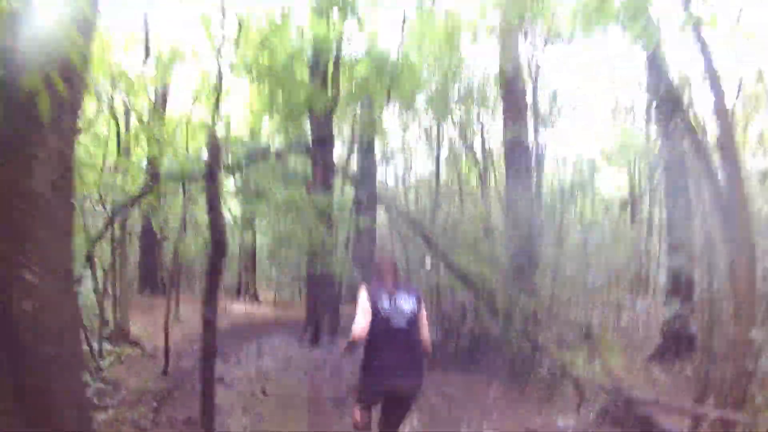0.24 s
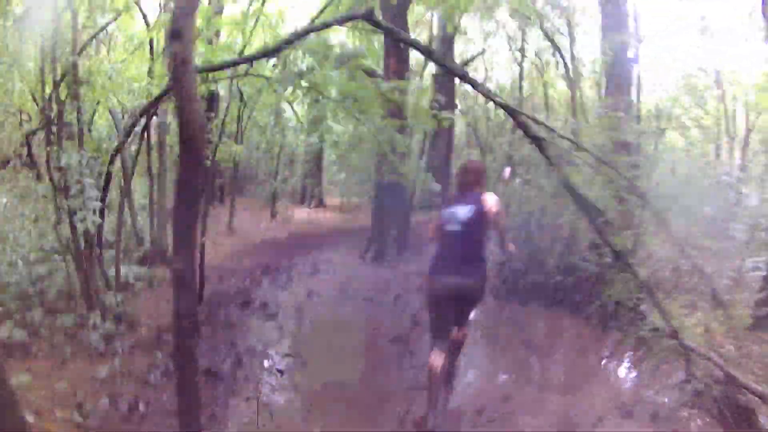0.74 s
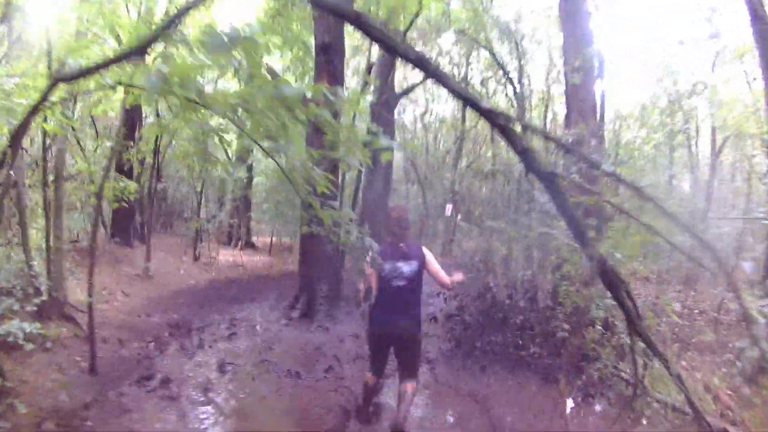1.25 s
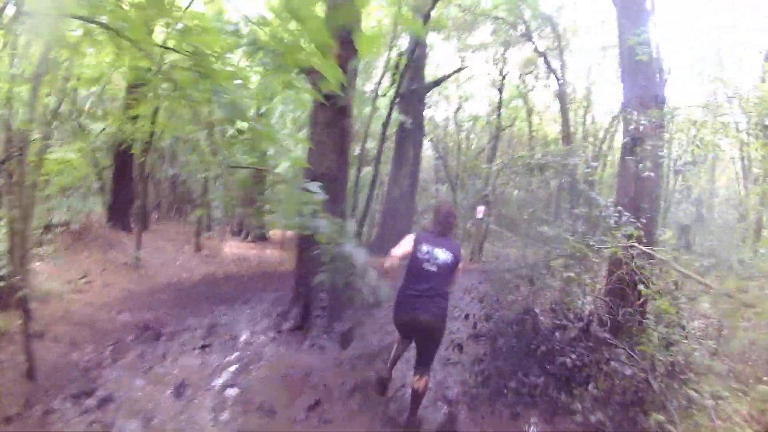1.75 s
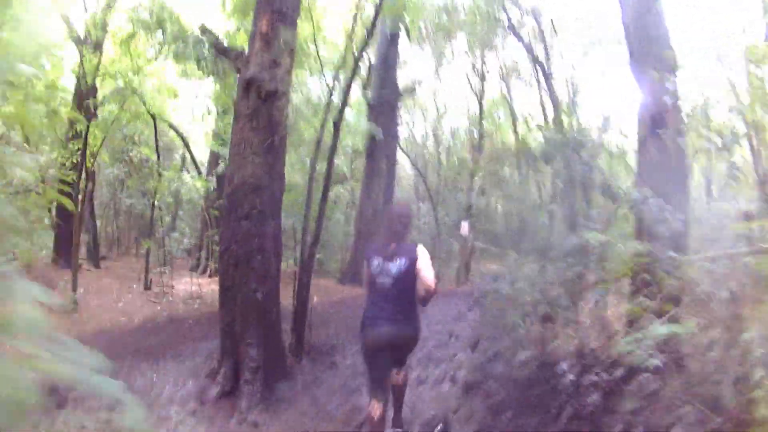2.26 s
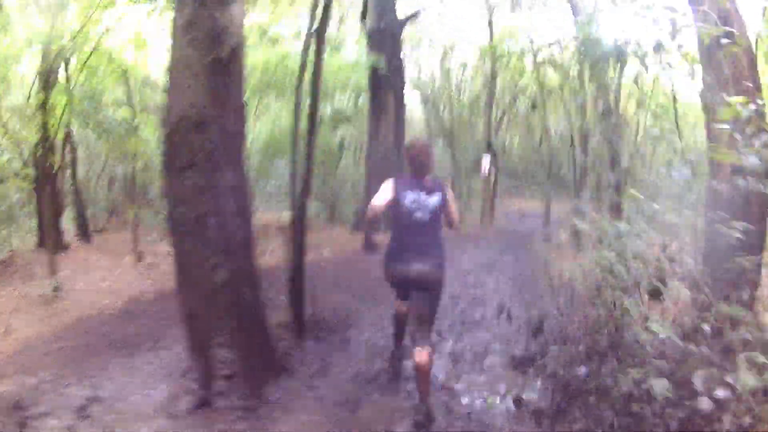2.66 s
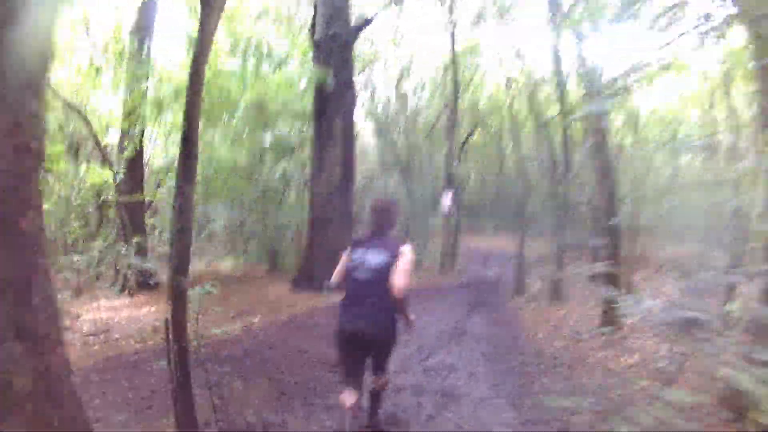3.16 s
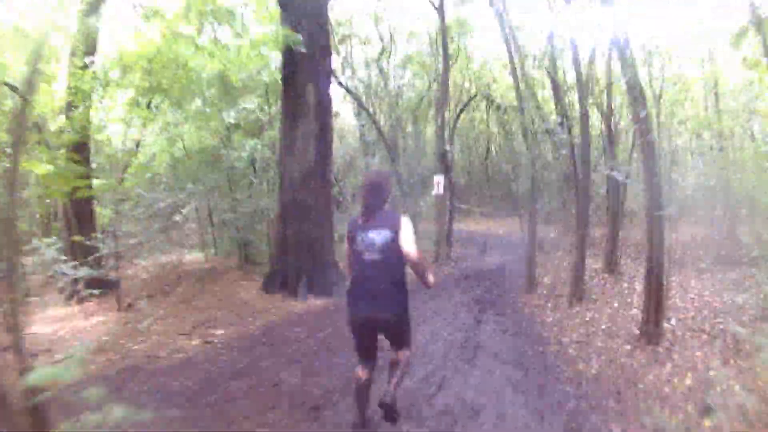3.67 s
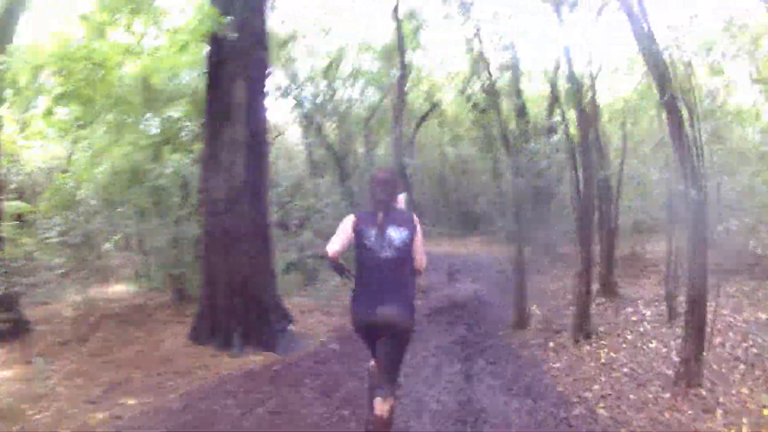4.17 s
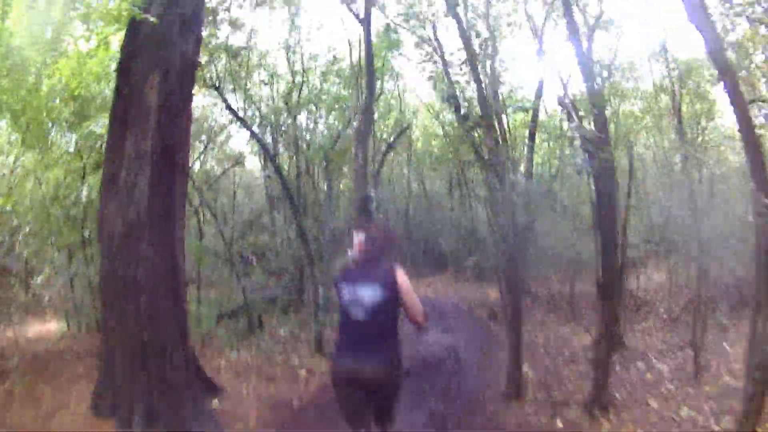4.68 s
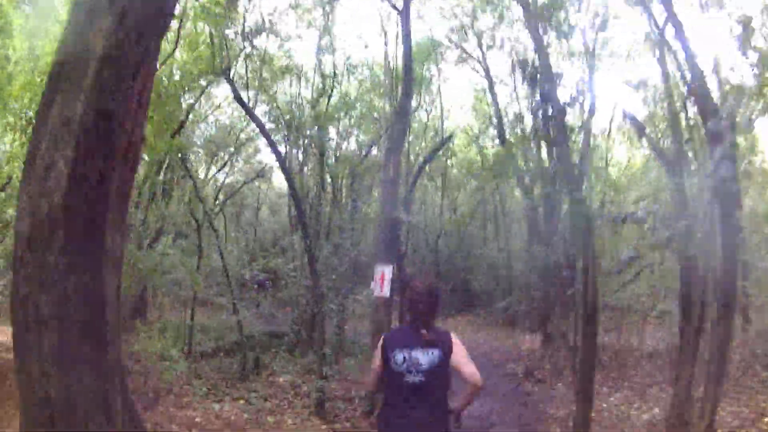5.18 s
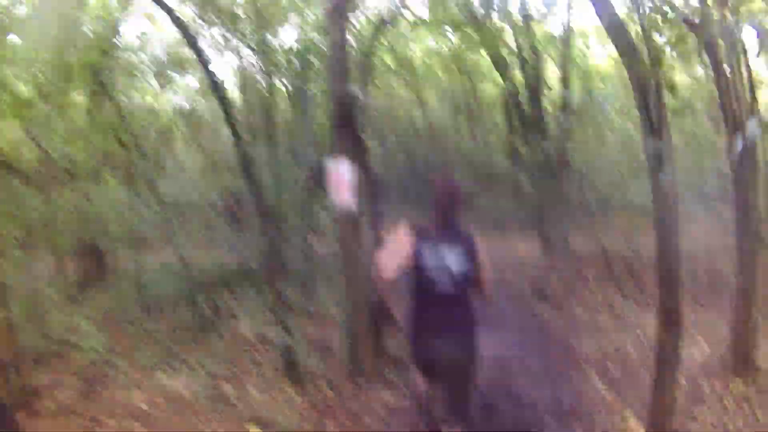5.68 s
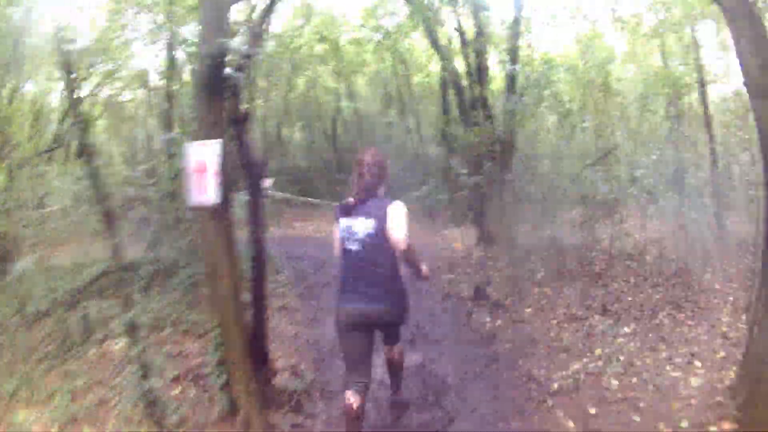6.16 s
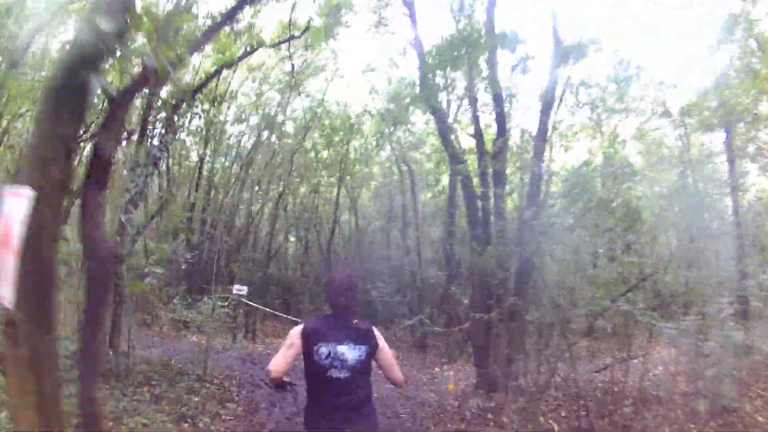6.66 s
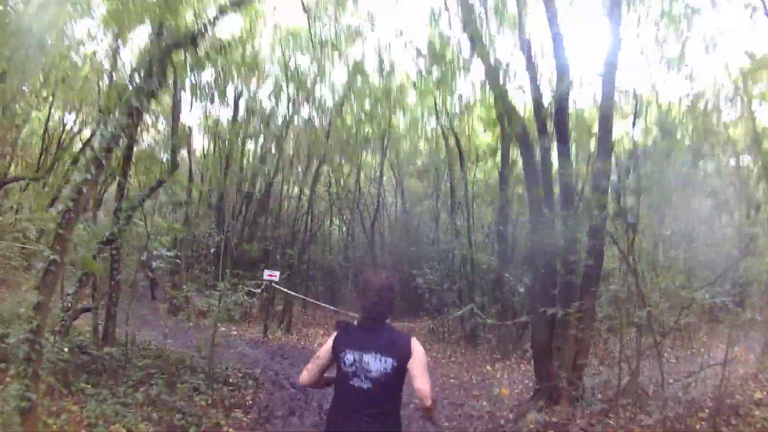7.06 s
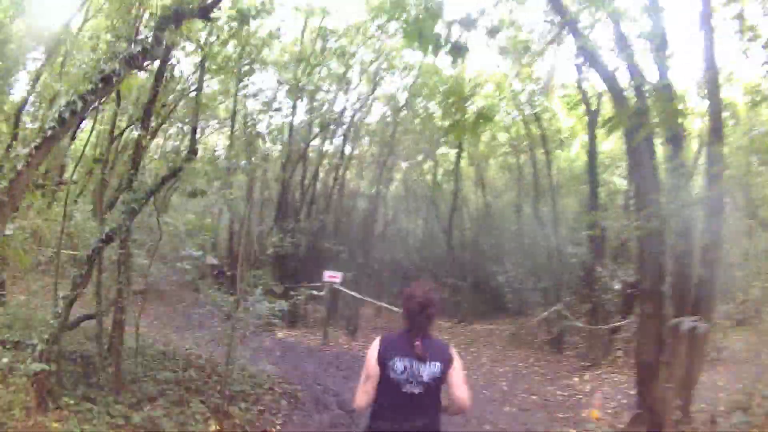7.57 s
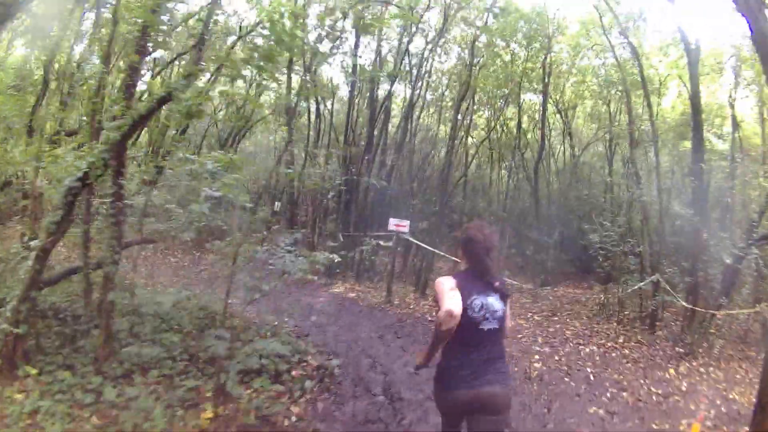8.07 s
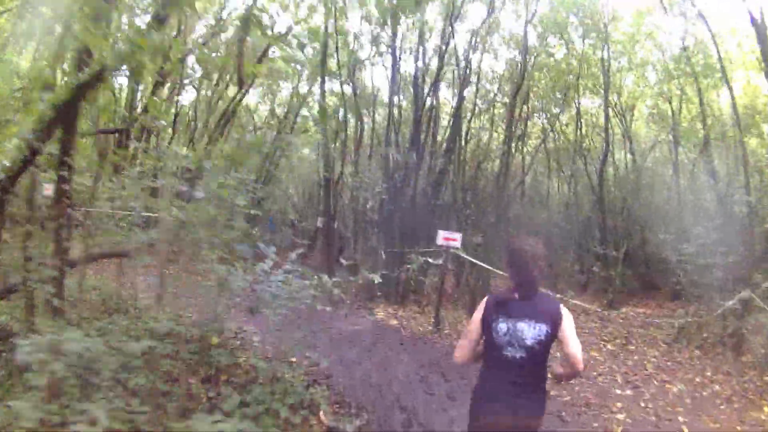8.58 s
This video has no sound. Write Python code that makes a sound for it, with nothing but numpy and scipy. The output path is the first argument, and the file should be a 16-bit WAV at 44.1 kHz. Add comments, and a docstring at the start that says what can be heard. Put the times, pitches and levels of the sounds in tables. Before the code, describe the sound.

Wet mud squelches and sprays under running feet on a forest path. The microphone rides on the runner inside a closed case, so the splats sound boxy and mix with low rumble, deep bumps and small rattles, over faint hiss and a thin whine. The mud is wettest at first. Later, hard distorted thumps of the case hitting the runner take over, each followed by a short drop in level.

```python
"""A small camera in a sealed case rides with a runner along a muddy woodland trail.
From the start, mud sloshes and splats through the case over a low strap rumble, faint hiss and whine.
Strides jolt the case and make it boom; soon bubbles gloop and the camera rattles inside.
From 5.4 s on, hard slams against the runner's body overload the microphone,
and the whole sound ducks for a moment after each one."""
import sys
import numpy as np
from scipy import signal
from scipy.fft import rfft, irfft
from scipy.io import wavfile
from scipy.ndimage import uniform_filter1d

SR = 44100
rng = np.random.default_rng(int(sys.argv[2]) if len(sys.argv) > 2 else 0)


def inscribe(sig):
    """Save sig as 16-bit PCM at rate SR to the path in sys.argv[1].

    A 1-D sig is mono; a 2-D sig holds one channel per row.
    Samples are clipped to [-1, 1] before scaling.
    """
    pcm = np.round(np.clip(np.atleast_2d(sig).T, -1, 1) * 32767)
    wavfile.write(sys.argv[1], SR, pcm.astype(np.int16))


N = 389403

# tone of the amplifier's hiss: f/Hz, level/dB
HISS_SPECTRUM = [(150, -5), (1000, -11.5), (3000, -24.5), (6000, -30.5), (10000, -33), (16000, -34)]
# steady churn of feet in wet mud: t/s, slosh level/dB, strap rumble level/dB
CHURN = [(0, -44, -32), (.12, -43, -34), (.22, -38.5, -34.5), (.42, -38, -36.5), (.52, -48.5, -35.5),
         (.75, -49, -38), (1.05, -43.5, -36), (1.2, -40.5, -37.5), (1.5, -39, -37.5), (1.75, -43, -39),
         (2.05, -42, -35), (2.35, -46.5, -45), (2.5, -42.5, -33.5), (2.9, -43.5, -33), (3.2, -46, -31.5),
         (3.42, -42, -43.5), (3.65, -52.5, -36.5), (3.85, -49, -27.5), (4.15, -41, -37), (4.4, -49, -30.5),
         (4.7, -47, -37), (5.3, -48.5, -33.5), (5.55, -53.5, -33.5), (6.2, -49.5, -34), (6.6, -49, -38.5),
         (7.1, -50, -35), (7.45, -44.5, -33), (7.7, -52.5, -41.5), (8.3, -51.5, -33.5), (8.6, -51.5, -42),
         (8.83, -40.5, -20)]
# splats of mud and rubs on the case: t/s, level/dB, thud offset/dB, spray offset/dB, fade time/s
SPLATS = [(0.0805, -30, -15, -17.5, 0.044), (0.186, -25.5, -19, -24, 0.24),
          (0.347, -26.5, -11.5, -26, 0.039), (.4668, -46, -21, -27, .061), (.541, -27, -19, -15, 0.31),
          (0.807, -26, -38, -22, 0.093), (.897, -33, -9, -17.5, 0.086), (1.015, -28.5, -10, -16.5, 0.048),
          (1.141, -27.5, -18, -31, .062), (1.189, -29, -30, -32, 0.12), (1.31, -28.5, -18, -25, 0.17),
          (1.5899, -20, -34, -26, 0.029), (1.6182, -30, -38, -17, 0.63), (1.808, -32.5, -31, -13, 0.11),
          (1.93, -34, -27, -30, 0.16), (1.9584, -24, -23, -40, 0.068), (2.076, -30, -19, -26, 0.11),
          (2.119, -30, -32, -17.5, 0.22), (2.2218, -32, -32, -16, 0.22), (2.337, -32.5, -17, -18, 0.23),
          (2.5042, -28, -28, -22, 0.072), (2.531, -26.5, -16, -25, 0.23), (2.6407, -32.5, -30, -18, 0.077),
          (2.86, -27, -23, -20, 0.14), (2.906, -26.5, -27, -25, 0.25), (2.933, -22.5, -13, -23, 0.19),
          (3.091, -28, -15, -11, 0.084), (3.1224, -26.5, -15, -26, 0.035),
          (3.1964, -23.5, -22, -24.5, 0.067), (3.2867, -24.5, -30, -31, 0.022),
          (3.3925, -26, -29, -30, 0.14), (3.462, -31.5, -28, -10.5, 0.077), (3.6468, -31, -12, -19, 0.095),
          (3.767, -26, -7.5, -27, 0.046), (4.17, -32, -25, -23, .15), (4.3272, -30, -11, -27, 0.029),
          (4.4562, -30.5, -21, -22, 0.14), (4.602, -33, -22, -11.5, 0.14), (4.941, -31, -30, -23, 0.071),
          (4.993, -31.5, -36, -22, 0.2), (5.0945, -37, -10, -18, 0.18), (5.208, -34, -29, -22, 0.075),
          (5.3644, -27, -12, -16.5, 0.18), (5.712, -32.5, -15, -21, 0.45), (5.7662, -28.5, 1.5, -27, 0.051),
          (5.9605, -39, -4, -32, .05), (5.989, -24, -18, -24, 0.03), (6.1531, -22.5, 2, -14.5, 0.13),
          (6.4642, -24.5, -17, -15.5, 0.092), (6.491, -28.5, -3.5, -19, .059),
          (6.5785, -29.5, -11.5, -18, .084), (6.875, -26.5, -7.5, -25, 0.055),
          (7.1925, -28, -17, -15.5, 0.072), (7.223, -26, -7, -24, 0.058), (7.2735, -27.5, -1, -31, 0.13),
          (7.324, -28, 2.5, -26, 0.028), (7.6198, -27, -4, -19.5, 0.043), (7.9193, -24, -4.5, -22, 0.017),
          (7.9924, -23, -5, -16, 0.16), (8.0744, -31.5, 10, -15, 0.042), (8.347, -27, -16, -18.5, 0.4),
          (8.3898, -21.5, 9, -13, 0.083), (8.625, -37, -3.5, -31, 0.11), (8.746, -21, -4, -17.5, 0.12)]
# fine spray thrown up by a heel: t/s, level/dB
SHOWERS = [(.2748, -62), (.403, -43.5), (.52, -46), (.7796, -45), (1.042, -45), (1.345, -43), (1.4107, -45),
           (1.435, -40), (1.82, -43.5), (2.23, -43.5), (2.652, -40.5), (2.718, -45), (3.242, -44),
           (3.366, -47), (4.023, -48), (4.26, -41.5), (6.38, -46), (7.53, -47), (7.582, -45), (8.68, -50),
           (8.72, -45)]
# notes at which the case's walls, main cavity, small gaps and vent ring: f/Hz, width/Hz, level/dB
WALL_MODES = [(144, 83, 0.5), (300, 160, 0), (429, 120, -3.5), (555, 185, -1.5), (715, 220, 0.5)]
CAVITY_MODES = [(1240, 240, -7), (1347, 117, -2.5), (1470, 107, -1), (1590, 130, -2.5), (1748, 130, -4.5),
                (1903, 160, -5)]
GAP_MODES = [(2763, 490, 4.7), (3340, 500, 2.7), (4042, 320, 5.1)]
VENT_MODES = [(4710, 1530, 3.5), (5360, 430, -8), (6300, 1500, -7), (7510, 360, -9)]
# tone of the strap's rumble: f/Hz, level/dB
RUMBLE_SPECTRUM = [(15, 3), (30, 12.5), (50, 8.5), (80, 1.5), (120, -8), (180, -30), (300, -54.5),
                   (900, -120)]
# jolts of the case on its strap: t/s, level/dB, f/Hz, fade time/s
JOLTS = [(0.075, -6.5, 49.2, 0.16), (.656, -24, 110, 0.061), (.861, -25.5, 70, 0.042),
         (0.939, -3, 49.3, 0.11), (1.489, -23, 45.4, 0.12), (1.523, -20, 44.6, 0.15),
         (1.577, -23, 43.8, 0.18), (2.152, -18, 47, .13), (2.339, -22, 45.3, 0.055),
         (2.368, -8.5, 40, 0.21), (2.535, -7, 43.7, 0.082), (2.587, -11.5, 50, 0.16),
         (2.755, -13, 31.2, .15), (2.81, -19, 27, 0.27), (2.983, -5, 50.5, 0.14), (3.022, -17, 55, 0.086),
         (3.1, -18.5, 45.3, .15), (3.148, -19, 42, 0.099), (3.196, -23, 38.5, .12),
         (3.527, -14, 36.8, 0.19), (3.599, -20, 40.3, 0.23), (3.767, -3.5, 52.5, 0.14),
         (3.821, -20, 52.3, 0.1), (4.307, -19, 33.3, 0.17), (4.34, -15.5, 35.4, .16),
         (4.474, -20.5, 44, 0.24), (4.662, -14, 32.8, 0.19), (4.722, -25, 114, 0.044),
         (4.747, -21.5, 39.2, 0.083), (4.841, -13.5, 47.7, .15), (5.044, -13.5, 30.6, 0.28),
         (5.187, -13.5, 46.2, 0.14), (5.38, -5, 32.7, 0.32), (5.43, -2, 92.3, 0.089),
         (5.736, -13, 45, 0.022), (5.755, -6.5, 39, 0.082), (5.972, -8, 48, 0.12), (6.131, -2, 26.7, 0.18),
         (6.187, -2, 88.4, 0.074), (6.361, -10, 50.9, 0.29), (6.443, -17, 32.2, 0.71),
         (6.487, -20, 124, 0.079), (6.493, -1, 42.6, 0.18), (6.531, 5, 50.9, 0.08), (6.867, -16, 37, 0.15),
         (6.912, -17.5, 28.2, 0.13), (7.075, -16, 40, 0.12), (7.197, -13.5, 58.6, 0.034),
         (7.218, -10, 34.3, 0.14), (7.322, -6.5, 39, 0.087), (7.575, -14, 47.7, 0.38),
         (7.603, -6, 27.6, 0.23), (7.631, -1.3, 30, 0.044), (7.67, -6, 44.3, .055), (7.779, -15, 44.3, 0.1),
         (7.986, -5, 48, 0.077), (8.04, 0.5, 40, 0.062), (8.083, -2.5, 59.7, 0.08),
         (8.364, -1.5, 36, 0.061), (8.412, 3, 49.2, 0.11), (8.44, -4.5, 84, 0.036), (8.59, -13, 50.3, 0.11),
         (8.731, -2.5, 32.3, 0.47), (8.781, 1.5, 90.8, 0.11)]
# hard slams of the case against the runner: t/s, level/dB, f/Hz, fade time/s, slowness of the rise
SLAMS = [(5.4, 14, 55.9, 0.051, 5.1), (6.157, 15, 55.9, 0.055, 4), (7.2334, 6.5, 58.8, 0.047, 7.8),
         (7.276, 7.5, 46.6, 0.059, 2.3), (7.9976, 20.5, 57.7, 0.0523, 3.87), (8.388, 19, 57.6, 0.069, 3.5),
         (8.7509, 20.5, 59.2, 0.035, 4.5)]
# bubbles closing in the mud: t/s, level/dB, first f/Hz, last f/Hz, length/s
GLOOPS = [(.224, -39, 820, 860, .025), (.343, -38, 1000, 1150, .015), (2.685, -42, 420, 900, .05),
          (2.872, -40, 620, 660, .025), (2.92, -41, 320, 600, .035)]
# rattles of the camera against its case: t/s, level/dB, click offset/dB
RATTLES = [(0.849, -35, -11), (2.057, -36.5, -15), (2.369, -33, -10.5), (2.761, -30, -16.5),
           (2.865, -50, -8), (3.536, -41.5, -7.5), (3.619, -32, -21), (4.314, -42.5, -3),
           (4.389, -40.5, -15), (4.509, -39, -18), (4.677, -41.5, -4.5), (4.715, -36, -21),
           (5.097, -32, -15.5), (5.328, -43, -9), (5.391, -23, -17), (5.41, -19.5, -21), (5.759, -35, -8.5),
           (5.842, -33.5, -16), (6.494, -29.5, -16.5), (6.884, -31, -10), (7.227, -24.5, -14.5),
           (7.322, -35, -12), (7.624, -52.5, 11.5), (7.921, -43.5, -8), (8.064, -24.5, -13),
           (8.638, -36.5, -16)]
# hollow ring of the camera body and click of the latch: f/Hz, width/Hz, level/dB
BODY_MODES = [(355, 140, 1), (719, 88, 2), (1158, 90, -5.5)]
LATCH_MODES = [(2530, 390, 3), (2946, 520, 7.5), (3160, 160, -10.5)]
# brief dips of the whole sound after some jolts: t/s, length/s, level/dB
DIPS = [(0.99, 0.15, -1.5), (2.392, 0.15, -2.5), (2.622, 0.17, -3.5), (3.036, 0.17, -3),
        (3.841, 0.16, -10.5), (5.403, .05, -11), (5.484, .14, -11.5), (5.804, .155, -13),
        (6.014, 0.16, -12.5), (6.224, .161, -10), (6.387, 0.26, -5.5), (6.57, 0.15, -5), (7.24, .078, -4),
        (7.314, .149, -5), (7.635, 0.071, -13), (7.711, 0.14, -7), (7.996, .036, -6.5), (8.04, 0.037, -11),
        (8.096, .037, -13), (8.38, .034, -6.5), (8.419, 0.2, -14.5), (8.749, .08, -8)]


def gain_of(db):
    """Turns decibels into a number to multiply by."""
    return 10 ** (np.asarray(db) / 20)


def evened(x):
    """Scales a signal to an average strength (rms) of 1."""
    return x / np.sqrt(np.mean(x ** 2) + 1e-20)


def add(mix, start_s, sound):
    """Mixes a sound in at a given time."""
    part = mix[round(start_s * SR):][:len(sound)]
    part += sound[:len(part)]


def noise(spectrum):
    """Steady noise with the given mix of low and high tones."""
    hz, db = np.transpose(spectrum)
    bins_hz = np.fft.rfftfreq(N, 1 / SR)
    gains = gain_of(np.interp(np.log(bins_hz + 1), np.log(hz), db))
    return evened(irfft(rfft(rng.standard_normal(N)) * gains, N))


def ring(drive, modes):
    """Shakes an object so it rings at its own notes (modes); wider ones die sooner."""
    t = np.arange(2048) / SR
    response = sum(gain_of(db) * np.sqrt(width) * np.exp(-np.pi * width * t) * np.sin(2 * np.pi * hz * t)
                   for hz, width, db in modes)
    response *= 1 - np.exp(-t / 0.00074)  # a soft start keeps the sound close to those notes
    return signal.oaconvolve(drive, response / np.linalg.norm(response))[:N]


def swell(rise_s, fade_s, slowness=0.83):
    """A loudness curve that rises to 1, then falls by 60 dB every fade_s."""
    t = np.arange(round(.4 * SR)) / SR
    shape = (1 - np.exp(-t / rise_s)) ** slowness * gain_of(-60 * t / fade_s)
    return shape / shape.max()


def flicker(size, depth_db):
    """A random gain that changes over about size samples."""
    slow = rng.standard_normal(N // 10 + 2)
    for _ in range(2):
        slow = uniform_filter1d(slow, size // 10)
    return evened(np.interp(np.arange(N) / 10, np.arange(len(slow)), gain_of(depth_db * evened(slow))))


def churn_db(column):
    """One level column of CHURN, sample by sample."""
    rows = np.array(CHURN)
    return np.interp(np.arange(N) / SR, rows[:, 0], rows[:, column])


def electronics(whine_hz=13254, flip_hz=40.9, whine_db=-72, hiss_db=-53.5):
    """The amplifier hisses; a high whine keeps flipping sign, which splits it into many close tones."""
    t = np.arange(N) / SR
    flips = np.sign(np.sin(2 * np.pi * flip_hz * t))
    whine = np.sqrt(2) * np.sin(2 * np.pi * whine_hz * t) * flips
    return gain_of(whine_db) * whine + gain_of(hiss_db) * noise(HISS_SPECTRUM)


def mud(drops_per_s=150, splat_rise_s=0.0039, drying_db_per_s=-1.05):
    """Sloshing, droplets and splats make the walls, cavity, gaps and vent of the case ring."""
    slosh_db = churn_db(column=1)
    lumps = flicker(size=200, depth_db=1.0) * flicker(size=1800, depth_db=1.3)
    drop_sizes = gain_of(4.5 * np.minimum(rng.exponential(1, N), 3))
    drops = evened(drop_sizes * (rng.random(N) < drops_per_s / SR))
    mist_db = 0.72 * slosh_db - 26.5  # steady spray changes less than the slosh
    # one row each for walls, cavity, gaps and vent
    power = (lumps * gain_of([0.4 * slosh_db - 36, slosh_db, mist_db, mist_db - 8.5])) ** 2
    shower = signal.windows.tukey(round(.035 * SR), .7)
    for start_s, db in SHOWERS:
        add(power[2], start_s - .004, (gain_of(db - 9) * shower) ** 2)
        add(power[3], start_s - .004, (gain_of(db - 16.5) * shower) ** 2)
    for start_s, db, thud_db, spray_db, fade_s in SPLATS:
        add(drops, start_s, [30.0])  # each splat lands with a slap
        shape = swell(splat_rise_s, fade_s)
        fizz_db = spray_db - 11 + drying_db_per_s * start_s  # thins as the trail gets drier
        for row, offset_db in zip(power, (thud_db, -9, spray_db - 3.5, fizz_db)):
            add(row, start_s - splat_rise_s, (gain_of(db + offset_db) * shape) ** 2)
    out = np.zeros(N)
    parts = zip(np.sqrt(power), (WALL_MODES, CAVITY_MODES, GAP_MODES, VENT_MODES))
    for (level, modes), wet_db, drop_gain in zip(parts, (2.5, 3.33, 1.5, 1.0), (.15, .25, .45, .8)):
        shares = gain_of([db for _, _, db in modes])
        for mode, share in zip(modes, shares / np.linalg.norm(shares)):
            # bubbles of changing sizes stir each note separately
            bubbling = flicker(size=350, depth_db=wet_db) * rng.standard_normal(N)
            out += share * ring(level * (bubbling + drop_gain * drops), [mode])
    return out


def jolts(jolt_slowness=1.97):
    """The case swings or slams with a low boom; each jolt shakes the strap, which rumbles on."""
    booms = np.zeros(N)
    rumble_power = gain_of(churn_db(column=2)) ** 2
    shake = swell(rise_s=0.01, fade_s=0.25)
    for start_s, db, hz, fade_s, slowness in [(*row, jolt_slowness) for row in JOLTS] + SLAMS:
        shape = swell(.0085, fade_s, slowness)
        t = np.arange(len(shape)) / SR
        add(booms, start_s, gain_of(db) * shape * np.sin(2 * np.pi * hz * t))
        shake_db = min(db, -6) - 15.5
        add(rumble_power, start_s, (gain_of(shake_db) * shake) ** 2)
    return booms + np.sqrt(rumble_power) * flicker(size=2000, depth_db=3.0) * noise(RUMBLE_SPECTRUM)


def gloops():
    """A shrinking air pocket sings a short rising note."""
    out = np.zeros(N)
    for start_s, db, first_hz, last_hz, length_s in GLOOPS:
        hz = np.geomspace(first_hz, last_hz, round(length_s * SR))
        note = np.sin(2 * np.pi * np.cumsum(hz) / SR)
        add(out, start_s, gain_of(db) * np.hanning(len(hz)) * note)
    return out


def rattles(length_s=0.0269, knocks_per_s=1500):
    """Bursts of small uneven knocks ring the camera body and the latch."""
    drive = np.zeros((2, N))
    burst = signal.windows.tukey(round(length_s * SR), .35)
    for start_s, db, click_db in RATTLES:
        add(drive[0], start_s - .003, gain_of(db - 1.5) * burst * np.linspace(1, .5, len(burst)))
        add(drive[1], start_s - .003, gain_of(db + click_db) * burst * np.linspace(1, .3, len(burst)))
    knocks = rng.choice([-1, 1], N) * (rng.random(N) < knocks_per_s / SR)
    drive *= evened(evened(knocks) + .35 * rng.standard_normal((2, N)))
    return ring(drive[0], BODY_MODES) + ring(drive[1], LATCH_MODES)


def scene():
    """All the sounds added into one channel."""
    return (jolts() + rattles() + mud() + gloops() + electronics())[None]


def record(dry, limit_db=-10.5, recover_db_per_s=600.5, lag_s=0.017, low_hz=21.7, high_hz=15800):
    """Overload flattens the peaks, the level dips, and the lowest and highest tones are cut."""
    t = np.arange(N) / SR
    dip_db = np.zeros(N)
    for start_s, length_s, db in DIPS:
        dip_db[(t >= start_s) & (t < start_s + length_s)] = db
    clipped = np.clip(dry, -.95, .95)
    # a limiter turns loud moments down, a little late, then lets go
    loud_db = 10 * np.log10(abs(uniform_filter1d(clipped[0] ** 2, size=500)) + 1e-12)
    cut_db = np.clip(1.83 * (loud_db - limit_db), 0, 11)
    cut_db = np.maximum.accumulate(cut_db + recover_db_per_s * t) - recover_db_per_s * t
    late_cut_db = np.maximum(np.interp(t - lag_s, t, cut_db), 0)
    level_db = np.minimum(dip_db, -late_cut_db)  # the deeper one wins
    ducked = clipped * gain_of(uniform_filter1d(level_db, size=200))
    # a capacitor blocks the deepest bass, which tilts the flat tops
    tilted = signal.lfilter([1, -1], [1, -np.exp(-2 * np.pi * low_hz / SR)], ducked)
    treble_cut = signal.firwin(511, high_hz, window=("kaiser", 9), fs=SR)
    return signal.oaconvolve(tilted, treble_cut[None], "same")


dry = scene()
out = record(dry)
inscribe(out)
```